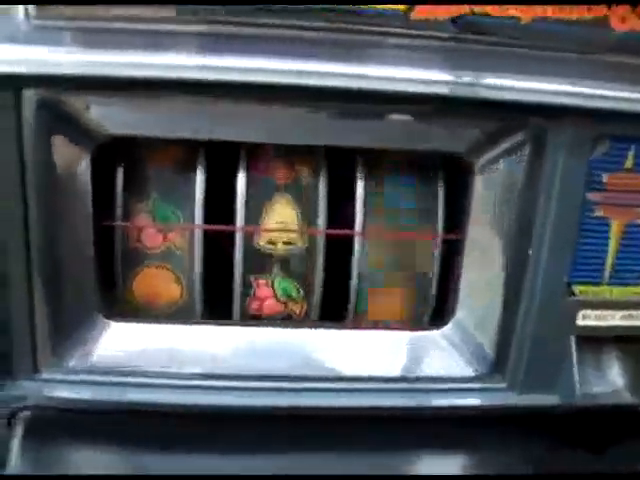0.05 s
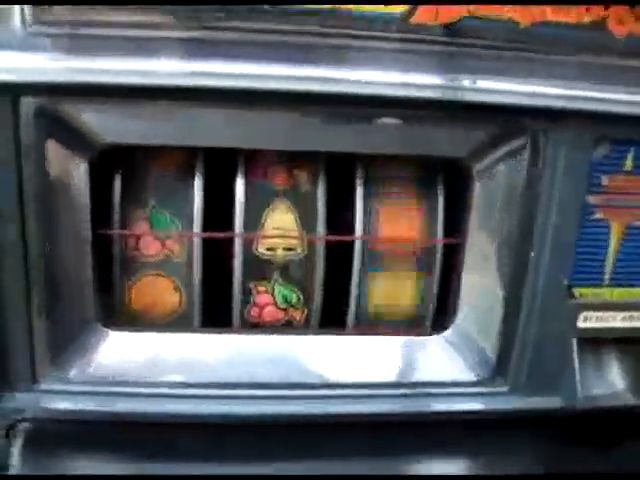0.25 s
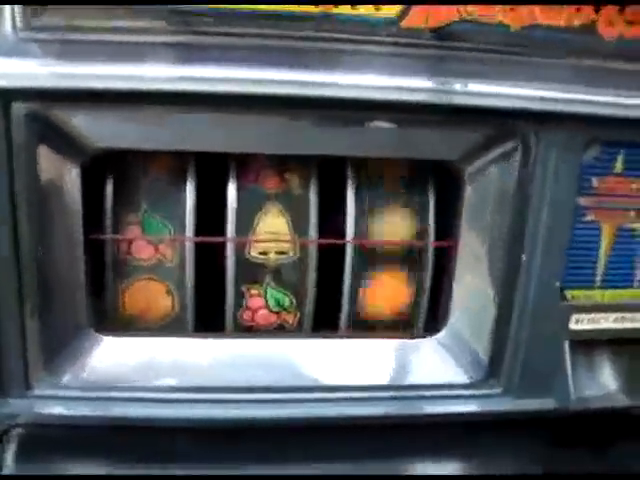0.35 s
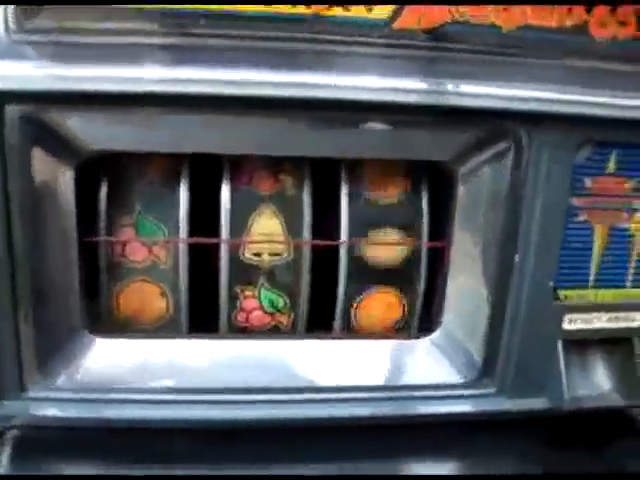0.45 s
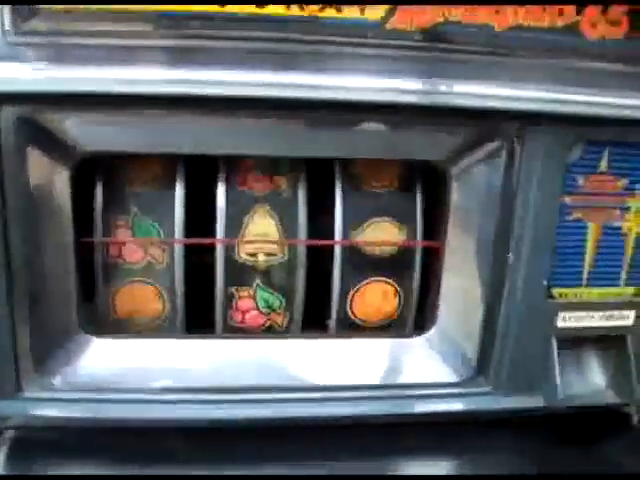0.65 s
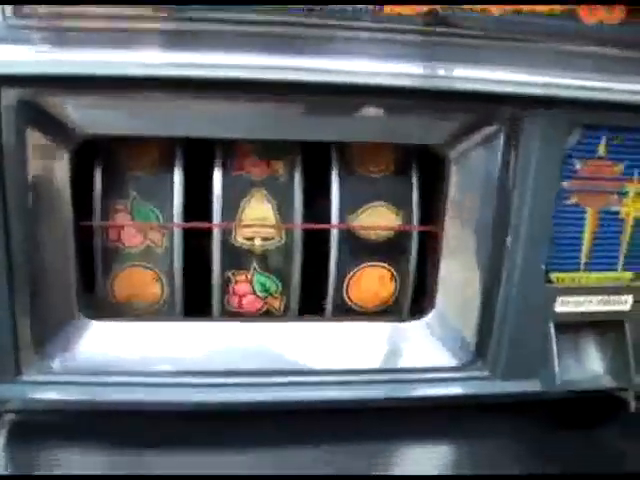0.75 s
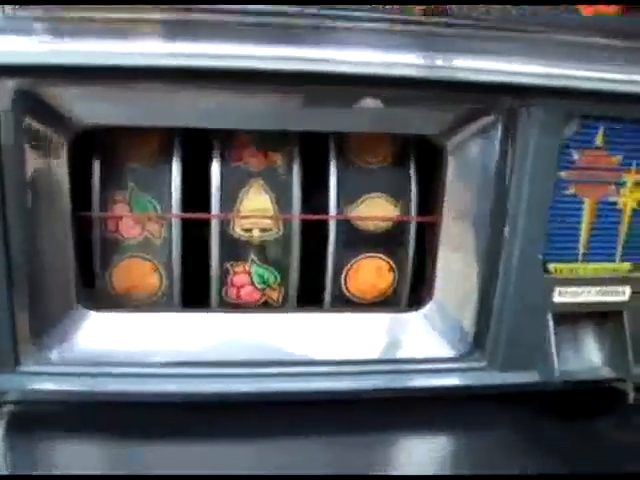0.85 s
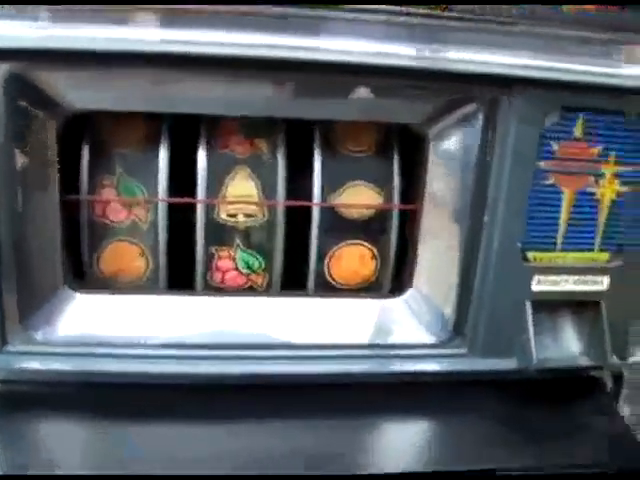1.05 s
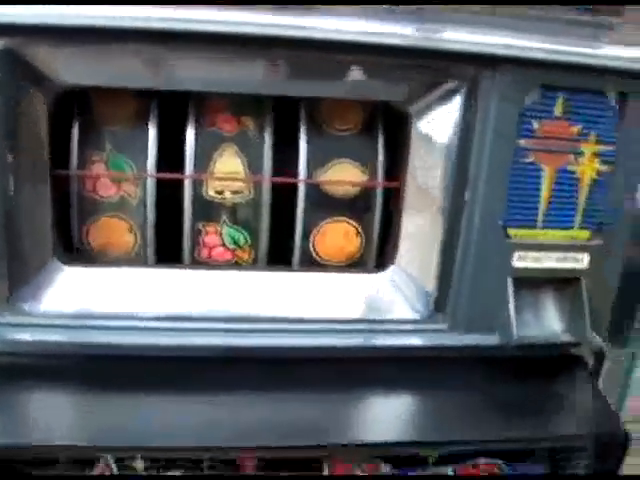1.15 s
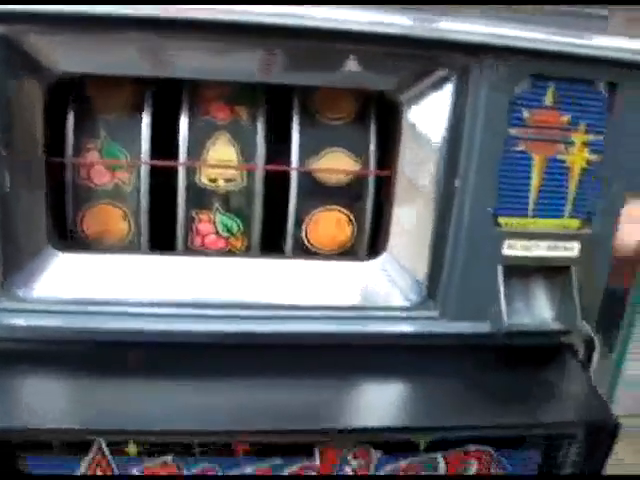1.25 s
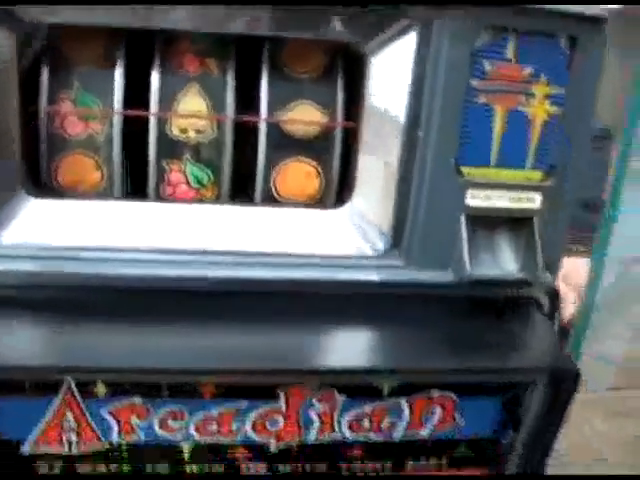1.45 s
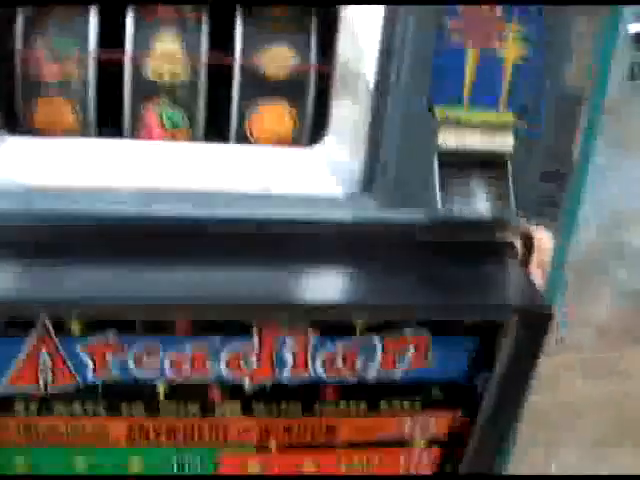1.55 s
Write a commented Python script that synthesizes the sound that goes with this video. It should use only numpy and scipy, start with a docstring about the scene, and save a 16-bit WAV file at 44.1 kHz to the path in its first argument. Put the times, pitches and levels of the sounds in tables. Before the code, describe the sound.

An old slot machine whirrs softly, close by in a room. From about 0.2 to 0.5 seconds its reel stops with a rapid, ringing metal clatter. At about 0.7 seconds a latch snaps with a loud, bright clack. Both echo briefly and make the hollow cabinet boom. The whirr dies by 0.9 seconds, leaving faint ticks around 1.0 and 1.25 seconds over low room noise and hum.

```python
"""A metal lever clatters over a notched wheel as the last reel of an old fruit machine runs out.
The lever drops in, the reel clangs to rest, and a moment later a steel latch snaps home with a loud clack.
The clatter and the clack echo in the room, and the hollow cabinet booms under the blows.
Behind them the clockwork whirrs and runs down, leaving a few faint ticks, room noise and a soft hum."""
import sys
import numpy as np
from scipy import signal
from scipy.fft import irfft
from scipy.io import wavfile

SR = 44100
rng = np.random.default_rng(int(sys.argv[2]) if len(sys.argv) > 2 else 0)


def pcm_store(signal):
    """Save signal as 16-bit PCM."""
    levels = np.round(np.clip(np.atleast_2d(signal), -1, 1) * 32767)
    wavfile.write(sys.argv[1], SR, levels.astype(np.int16).T)


N = 70560
BANDWIDTH_HZ = 8400  # the noises hold nothing above this

# The lever hits the teeth. Each row: start in seconds, level in dB, treble boost or cut in dB,
# level of the frame's clank in dB, rise time in seconds.
TOOTH_HITS = [(0.025, -53, -1, -42, .003), (0.1027, -35, 5.5, -49, 0.0013), (0.113, -51.5, 15, -39, .001),
              (.212, -22, -4, -32, 0.0017), (0.242, -27.5, 6, -29, 0.0033), (.251, -21.5, -3, -35, 0.00072),
              (0.257, -43, 2.5, -41, 0.0023), (0.2769, -14.5, -5, -35, 0.0038),
              (0.294, -41, 17.5, -32.5, .002), (0.3165, -15, -9.5, -27, 0.0038),
              (0.3421, -18, -11.5, -47, 0.0034), (0.3483, -24, -8, -48.5, 0.0025),
              (0.376, -54, 13.5, -30, .003), (0.398, -23, -6.5, -37.5, 0.0013),
              (.414, -45, -5, -53.5, 0.0034), (0.4493, -23, 3, -30, 0.0022), (0.472, -46, -6, -41, 0.0027),
              (0.514, -38, -2.5, -44.5, .002)]
# The tone of the bright lever and the duller frame. Each row: frequency in Hz, relative level in dB.
LEVER_COLOUR = [(500, -31), (1100, -34), (1500, -5), (1950, 0), (2250, -15), (2850, 1.5), (3300, -5),
                (4050, 1.5), (4700, -6), (5250, -11), (6900, -11.5), (7700, -15.5), (8300, -18.5)]
FRAME_COLOUR = [(90, -9), (220, 1), (400, -3), (630, 3.5), (760, 2), (1050, -10.5), (1500, 0.5),
                (1900, -5.5), (2600, -3.5), (6000, -22.5)]
# The steel wheel's notes. Each row: pitch in Hz, level in dB relative to the hit, fade time in seconds.
WHEEL_NOTES = [(748, -18, .34), (899, -27, .2), (1795, -21, .25), (1846, -19, .2), (2007, -16, .26),
               (2029, -17, .26), (2813, -15, .26), (2847, -14, .26), (3461, -22, .22), (3493, -23, .22),
               (3810, -15, .26), (4060, -18, .22), (4490, -19, .22)]


def lever(treble_hz=5000, crash_fade_s=0.071, echo_db=-11.5):
    """Each tooth makes the lever crash, the frame clank and the wheel ring."""
    steel, frame, clatter = noise(LEVER_COLOUR), noise(FRAME_COLOUR), np.zeros(N)
    treble = signal.sosfiltfilt(signal.butter(4, treble_hz, "high", fs=SR, output="sos"), steel)
    for start, db, treble_db, frame_db, rise in TOOTH_HITS:
        crash = steel + (from_db(treble_db) - 1) * treble
        clatter += from_db(db) * blow(start, rise, crash_fade_s) * crash
        clatter += from_db(frame_db) * blow(start, rise_s=0.004, fade_s=0.2) * frame
    ringing = ring(WHEEL_NOTES, [(start, db, rise) for start, db, _, _, rise in TOOTH_HITS])
    return clatter + from_db(echo_db) * room(clatter) + ringing


# The latch snaps and chatters. Each row: start in seconds, relative level in dB, rise time in seconds.
LATCH_HITS = [(0.6597, -10.5, 0.0025), (0.6632, -15.5, 0.0014), (0.674, -37, 0.00049),
              (0.693, -24.5, 0.00088), (0.743, -31.5, 0.0038), (0.764, -34, 0.0022)]
# The tone of its crack. Each row: frequency in Hz, relative level in dB.
LATCH_COLOUR = [(400, -26.5), (1000, -22), (1500, -1.5), (2200, -7), (2450, -6), (3000, -4), (3450, -6.5),
                (4200, 1.5), (5200, -3.5), (5650, 3), (6400, 2.5), (6750, -2.5), (7050, -2), (7350, -15),
                (7700, 0), (8300, -23.5)]
# The notes of the latch and of the frame it knocks on.
# Each row: pitch in Hz, level in dB relative to ring_db or knock_db, fade time in seconds.
LATCH_NOTES = [(1760, -19, .3), (2200, -17, .08), (3171, -25, .22), (3881, -21, .18), (4323, -18, .08),
               (4441, -21, .22), (5669, -15, .15), (6128, -13, .14), (6690, -11, .11), (6780, -14, .08),
               (6860, -13, .08), (6950, -14, .08), (7162, -12, .17)]
KNOCK_NOTES = [(415, -5.5, 0.6), (630, 0, 0.08), (731, 0, 0.11)]


def latch(crack_db=-0.5, ring_db=-11, knock_db=-39, knock_rise_s=0.051, echo_db=-3):
    """A hard, bright crack; the first hit leaves small steel parts ringing and knocks on the frame."""
    hits = sum(from_db(db + crack_db) * blow(start, rise, fade_s=0.022) for start, db, rise in LATCH_HITS)
    crack = noise(LATCH_COLOUR) * hits
    start, _, rise = LATCH_HITS[0]
    ringing = ring(LATCH_NOTES, [(start, ring_db, rise)])
    knock = ring(KNOCK_NOTES, [(start, knock_db, knock_rise_s)])
    return crack + from_db(echo_db) * room(crack) + ringing + knock


# The reel bumps the lever. Each row: start in seconds, level in dB, rise time in seconds.
REEL_BUMPS = [(0.349, -37.5, 0.0069), (0.387, -30.5, .006), (0.411, -30.5, 0.0031)]
# The reel's notes. Each row: pitch in Hz, level in dB relative to the bump, fade time in seconds.
CLANG_NOTES = [(1462, 0, .2), (1505, -5, .15), (1631, -6, .15), (1715, -4, .15)]


def reel():
    """The hollow reel clangs as it rocks to rest against the lever."""
    return ring(CLANG_NOTES, REEL_BUMPS)


# Thumps passed on to the cabinet. Each row: start in seconds, level in dB.
THUMPS = [(.28, -37.5), (0.391, -33.5), (0.458, -37), (.685, -39), (.75, -36)]
# The tone of its boom. Each row: frequency in Hz, relative level in dB.
CABINET_COLOUR = [(45, -24.5), (75, -26), (96, 2), (135, -1.5), (165, -31.5), (235, 5), (320, -8.5),
                  (650, -18.5), (1000, -18), (3000, -43)]
# Its panels' low notes. Each row: pitch in Hz, level in dB relative to the thump, fade time in seconds.
PANEL_NOTES = [(80, -9.5, 0.21), (95.7, 4, 0.38), (130, -4, 0.36), (211, -8, 0.72), (249, -10.5, .48)]


def cabinet(boom_db=-5, rise_s=0.014):
    """The panels of the hollow case swell and boom after the blows."""
    swells = sum(from_db(db + boom_db) * blow(start, rise_s, fade_s=0.45) for start, db in THUMPS)
    boom = noise(CABINET_COLOUR) * swells
    return boom + ring(PANEL_NOTES, [(start, db, rise_s) for start, db in THUMPS])


# The last faint ticks. Each row: start in seconds, level in dB.
TICKS = [(0.997, -44.5), (1.012, -48.5), (1.229, -48), (1.282, -47.5)]
# Their thin tone. Each row: frequency in Hz, relative level in dB.
TICK_COLOUR = [(1000, -9), (2300, -8), (3000, -9), (4800, 1), (5500, -9), (6400, -9), (7800, -15)]


def ticks():
    """Small parts tick as they settle inside the case."""
    taps = sum(from_db(db) * blow(start, rise_s=0.0018, fade_s=0.079) for start, db in TICKS)
    return noise(TICK_COLOUR) * taps


# How loud the clockwork is. Each row: time in seconds, level in dB.
WHIRR_LEVELS = [(0, -40), (.1, -42), (.2, -49.5), (.55, -41), (.8, -43), (.92, -61), (1.6, -64.5)]
# Its low tone. Each row: frequency in Hz, relative level in dB.
WHIRR_COLOUR = [(20, 3), (55, 1), (85, 8), (130, 12.5), (200, -2), (550, -1), (1100, -12.5), (1800, -12.5),
                (3500, -20.5), (7000, -24), (8200, -46.5)]


def clockwork():
    """The clockwork whirrs, then runs down."""
    return level(WHIRR_LEVELS) * noise(WHIRR_COLOUR)


# How loud the room noise is. Each row: time in seconds, level in dB.
ROOM_LEVELS = [(0, -43), (.95, -45), (1.25, -43.5), (1.45, -43.5), (1.6, -41.5)]
# Its tone. Each row: frequency in Hz, relative level in dB.
ROOM_COLOUR = [(20, 13), (35, -7), (60, 0.5), (125, 0.5), (180, -3.5), (260, -2.5), (700, -6), (1150, -4),
               (1550, -9.5), (2300, -8), (4200, -11), (4800, -8.5), (5400, -13.5), (6500, -12.5),
               (7600, -20.5), (8200, -15.5)]
# Faint humming notes. Each row: pitch in Hz, level in dB.
HUM_NOTES = [(244, -61), (422, -64.5), (522, -62)]


def background(hum_width_hz=6):
    """Nearly steady room noise, with a wavering hum made from very narrow bands of noise."""
    hum = np.zeros(N)
    for hz, db in HUM_NOTES:
        narrow_band = signal.iirpeak(hz, hz / hum_width_hz, fs=SR)
        hum += from_db(db) * rms_one(signal.lfilter(*narrow_band, rng.standard_normal(N)))
    return level(ROOM_LEVELS) * noise(ROOM_COLOUR) + hum


# How long the room echoes. Each row: frequency in Hz, fade time in seconds.
ECHO_FADES = [(150, 0.42), (800, 0.6), (2000, 0.33), (4000, 0.3), (7000, 0.13)]


def room(sound, delay_s=0.0046, build_s=0.0027):
    """The room answers a sound with a smooth wash of echoes that dies sooner in the treble."""
    edges_hz, echo = np.geomspace(60, 9000, 9), np.zeros(N)
    for low, high in zip(edges_hz, edges_hz[1:]):
        band_filter = signal.butter(2, [low, high], "band", fs=SR, output="sos")
        band = signal.sosfilt(band_filter, rng.standard_normal(N))
        echo += band * blow(delay_s, build_s, at_hz(ECHO_FADES, np.sqrt(low * high)))
    echo *= np.sqrt(2 * edges_hz[-1] / SR / np.sum(echo ** 2))  # about as loud as the sound itself
    return signal.fftconvolve(sound, echo)[:N]


def blow(start_s, rise_s, fade_s):
    """The loudness of one hit: it rises, then drops by 60 dB over each fade time."""
    age = np.arange(N) / SR - start_s
    rising = np.clip(age / max(rise_s, 1e-4), 0, 1)
    return rising * from_db(-60 * np.maximum(age - rise_s, 0) / fade_s)


def ring(notes, hits):
    """Every hit sets each of an object's notes ringing, with a slightly random strength."""
    ringing, t = np.zeros(N), np.arange(N) / SR
    for start, db, rise in hits:
        for hz, note_db, fade in notes:
            gain = from_db(db + note_db + rng.standard_normal())
            ringing += gain * blow(start, rise, fade) * np.sin(2 * np.pi * (hz * t + rng.random()))
    return ringing


def noise(colour):
    """A crowd of notes too close to tell apart; the colour sets how strong the lows and highs are."""
    hz = np.arange(N // 2 + 1) * SR / N
    strengths = from_db(at_hz(colour, hz)) * (hz < BANDWIDTH_HZ)
    phases = np.exp(2j * np.pi * rng.random(len(hz)))
    return rms_one(irfft(strengths * phases, N))


def level(rows):
    """A volume that glides between rows of seconds and dB."""
    return from_db(np.interp(np.arange(N) / SR, *np.transpose(rows)))


def at_hz(rows, hz):
    """Read between a table's rows, giving every octave the same space."""
    row_hz, values = np.transpose(rows)
    return np.interp(np.log(hz + 1e-3), np.log(row_hz), values)


def from_db(db):
    """Turn decibels into a number to multiply by."""
    return 10 ** (np.asarray(db) / 20)


def rms_one(sound):
    """Scale a sound to an average power of one."""
    return sound / np.sqrt(np.mean(sound ** 2) + 1e-20)


def scene():
    """The machine heard from just in front, in one channel."""
    return (lever() + reel() + latch() + cabinet() + ticks() + background() + clockwork())[None]


def record(dry, clip_level=0.61, cutoff_hz=15700):
    """A microphone that misses the highest treble; the loudest crack overloads it and spits a little."""
    narrow = signal.sosfilt(signal.cheby2(12, 60, BANDWIDTH_HZ + 200, fs=SR, output="sos"), dry)
    clipped = np.clip(narrow, -clip_level, clip_level)
    softened = signal.sosfilt(signal.butter(6, 9000, fs=SR, output="sos"), clipped)
    return signal.sosfilt(signal.cheby2(8, 60, cutoff_hz, fs=SR, output="sos"), softened)


dry = scene()
out = record(dry)
pcm_store(out)
```